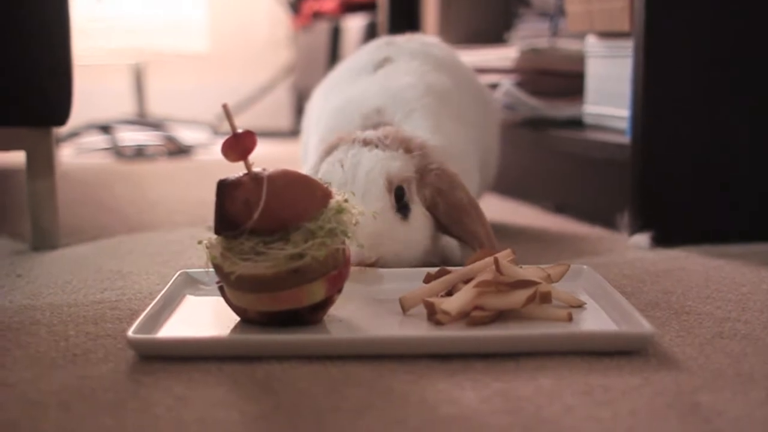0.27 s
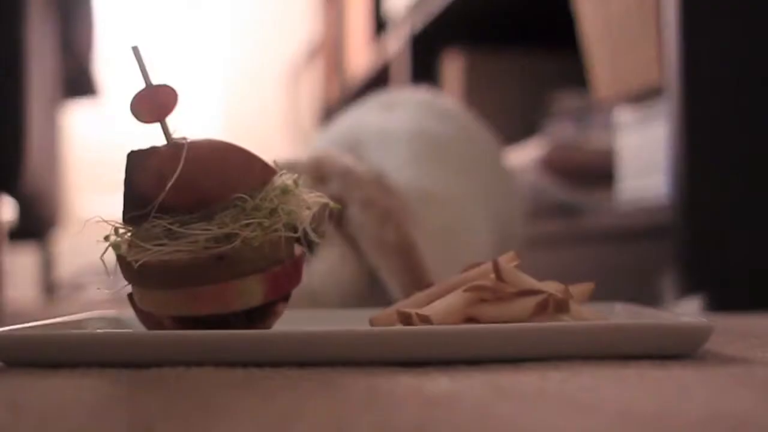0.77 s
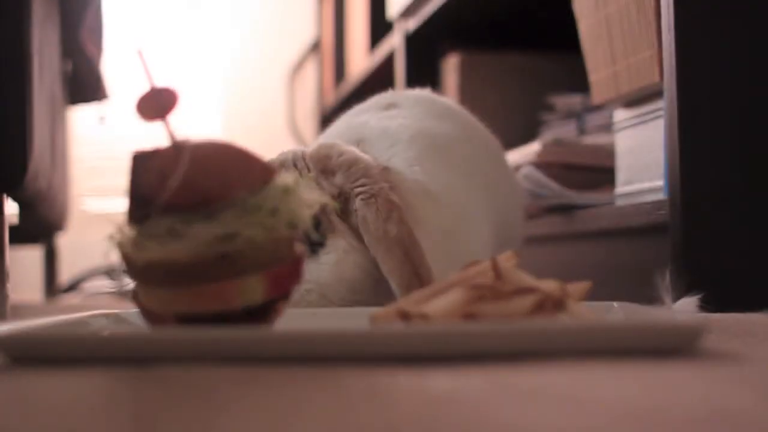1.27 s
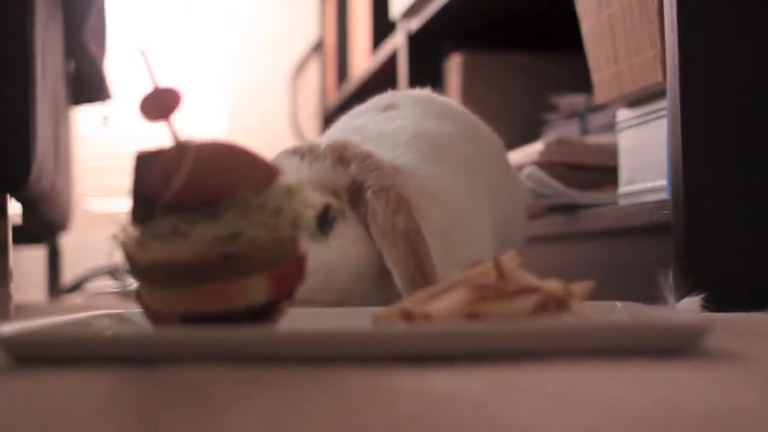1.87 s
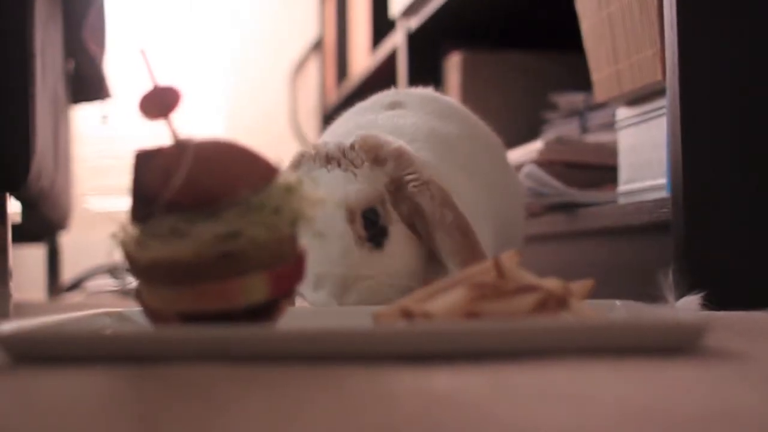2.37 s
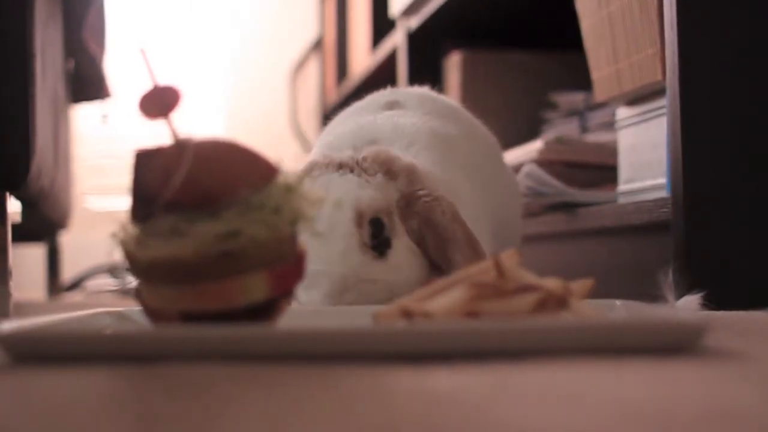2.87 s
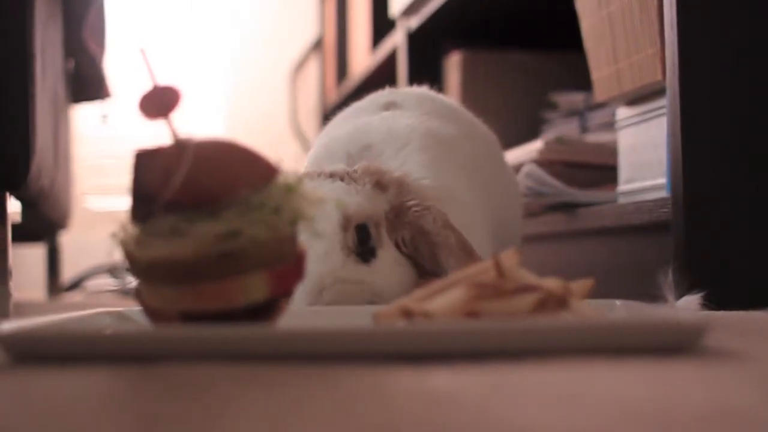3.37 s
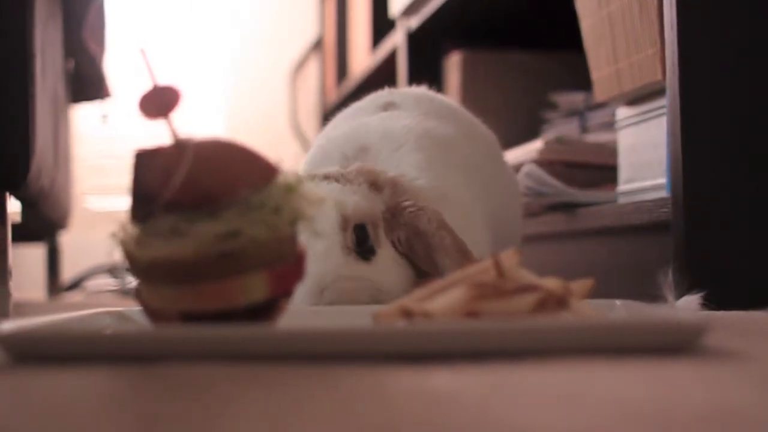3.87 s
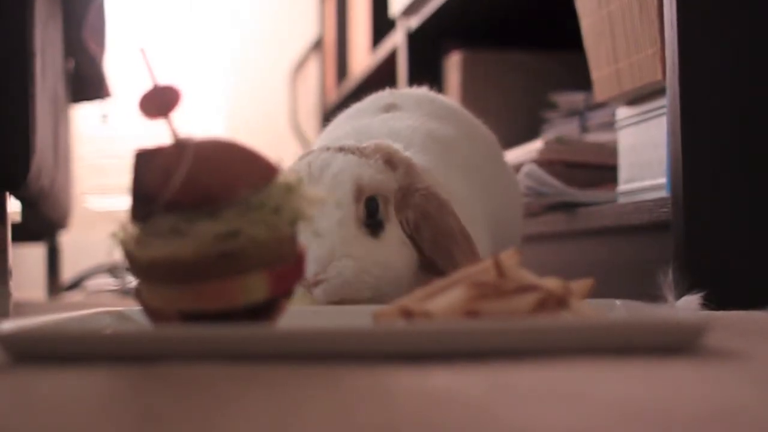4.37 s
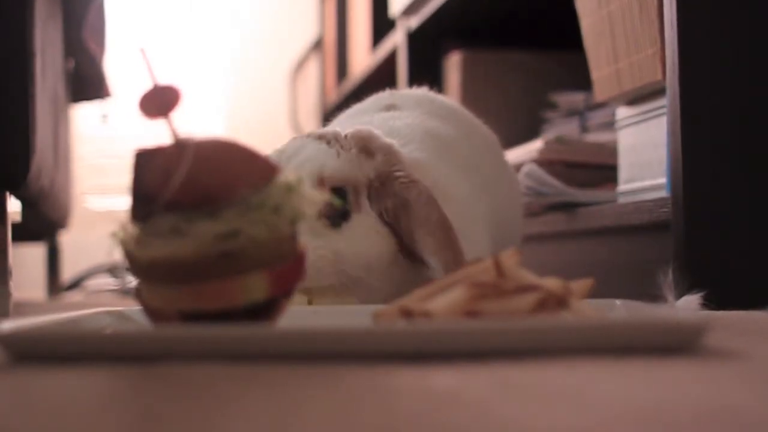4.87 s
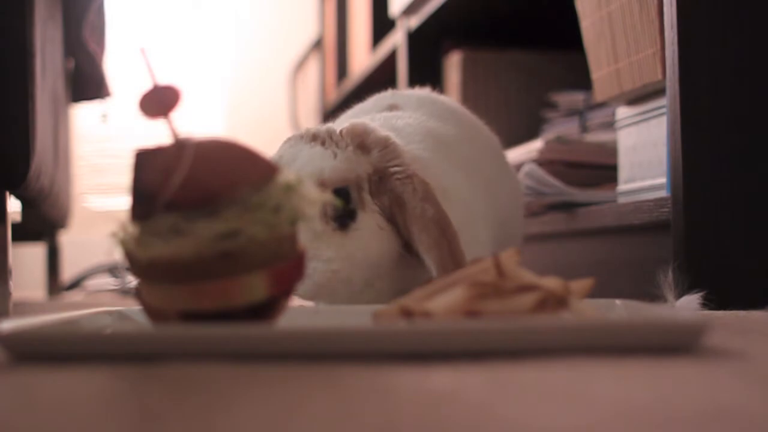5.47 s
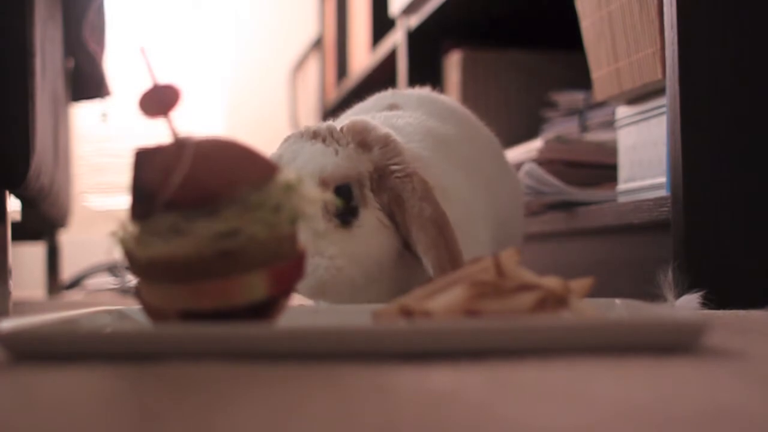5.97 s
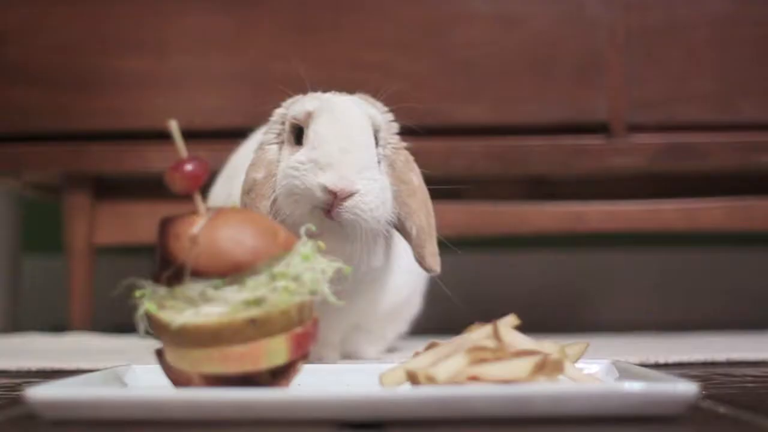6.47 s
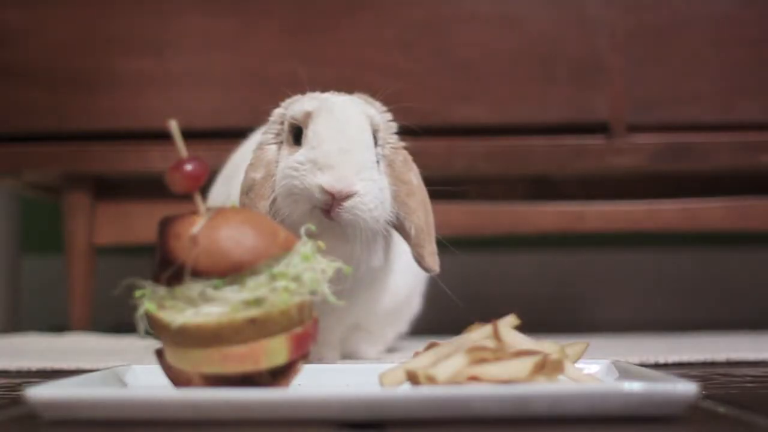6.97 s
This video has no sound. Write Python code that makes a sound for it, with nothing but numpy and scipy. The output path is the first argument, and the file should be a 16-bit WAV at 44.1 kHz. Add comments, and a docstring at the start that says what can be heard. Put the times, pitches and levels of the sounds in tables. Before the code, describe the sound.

Close rabbit eating: a bouncing tick, crisp leafy rustles with wet mouth clicks, soft grinding chews, one sharp crack, then brighter rustles and clicks.

```python
"""Rabbit eating sprouts, close up

On the carpet of a quiet room, a rabbit eats sprouts from a plate close to a small camera's microphone.
Shaped noise gives the rustle of tugged greens and the grinding of the jaw; struck resonances give
mouth clicks, a small dropped piece that bounces and a snapping stalk; short low tones give thumps.
A low hum swells and dies over rumble and hiss. Two short fades through silence part three shots."""
import sys
import numpy as np
from scipy import signal
from scipy.fft import rfft, irfft, next_fast_len
from scipy.io import wavfile
from scipy.ndimage import uniform_filter1d, map_coordinates

SR = 44100
rng = np.random.default_rng(int(sys.argv[2]) if len(sys.argv) > 2 else 0)


def gain_from_db(level_db):
    """Turn a decibel level (scalar or array-like) into a linear amplitude factor."""
    decades = np.asarray(level_db, float) / 20
    return 10 ** decades


def inscribe(sig):
    """Save sig as 16-bit PCM at rate SR to the path in sys.argv[1].

    A 1-D sig is mono; a 2-D sig holds one channel per row.
    Samples are clipped to [-1, 1] before scaling.
    """
    pcm = np.round(np.clip(np.atleast_2d(sig).T, -1, 1) * 32767)
    wavfile.write(sys.argv[1], SR, pcm.astype(np.int16))


N = 317916  # samples, about 7.2 s

# In stroke tables rise_s and fall_s are the times from the peak to 20 dB below it, before and after.
# In spectra only the shape counts: the noise is brought to rms 1 afterwards.

# background of each shot: start_s, rumble_at_start_db, rumble_at_end_db, hiss_db
AIR = [(0, -63, -57, -60.5), (.82, -63.5, -63.5, -59.5), (6.566, -69.5, -63, -57.5)]
# shapes of the building rumble and the microphone hiss: frequency_hz, density_db
RUMBLE_SPECTRUM = [(20, -11), (45, -10), (70, -2.5), (115, -2), (170, -5.5), (300, -20), (450, -48)]
HISS_SPECTRUM = [(150, -30), (250, 4.5), (414, 0), (710, -2.5), (1350, -4), (4000, -7), (9830, -11),
                 (13700, -12), (16000, -17.5)]

# mouth and teeth clicks, and at 0.868 s the sharp attack of the thump that follows: start_s, peak_db,
# brightest_hz, treble_db (over the click, before 5 dB more)
CLICKS = [(0.114, -48, 1780, -20), (0.137, -40, 1520, -23), (0.264, -52.5, 2520, 8),
          (0.308, -62.5, 740, 18.5), (0.868, -40, 770, -25), (1.268, -49, 1220, -10),
          (1.371, -49, 820, -40.5), (1.435, -43, 1910, -21), (1.606, -48.5, 1400, -25),
          (1.712, -39, 1580, -21), (1.718, -26, 2510, -18), (1.733, -30, 1450, 1), (1.805, -36, 2620, -24),
          (1.825, -29, 1450, -22), (2.698, -46, 3230, -22), (2.739, -42, 2430, -20),
          (2.783, -42.5, 2340, -15), (2.811, -36, 2420, -8), (2.822, -39, 2470, -25),
          (2.839, -39, 2370, -7), (3.057, -45.5, 1500, -18.5), (3.065, -48, 1440, -20),
          (3.448, -43.5, 1580, -16), (3.675, -47.5, 1370, -18), (3.771, -45, 1210, -24),
          (3.995, -46.5, 870, -7), (4.194, -51, 1300, -20), (4.288, -46.5, 1170, -10),
          (4.323, -36.5, 2250, -13), (4.505, -53.5, 1340, -5.5), (4.543, -48, 891, -11),
          (4.574, -52, 2000, -12), (4.721, -48, 2400, -2), (5.114, -53, 1320, -18), (5.451, -49, 1360, -13),
          (5.461, -53, 1420, -9), (5.533, -50, 1310, -21), (5.582, -35, 1580, -30),
          (5.611, -33.5, 2650, -29), (5.63, -35.5, 2120, -23.5), (5.749, -41, 1080, -24),
          (5.749, -47.5, 2600, -24), (6.058, -49, 2140, -20), (6.441, -47, 1310, -7),
          (6.517, -18.5, 3900, -19), (6.636, -37.5, 1210, -13), (6.757, -24, 3850, -21),
          (6.949, -39, 2540, -9), (7.058, -33, 1670, -14), (7.157, -41, 2420, -12)]
# resonances of the mouth: frequency_hz, width_hz (at least 300 is used), relative_level_db
MOUTH = [(600, 1300, -38), (1690, 260, -3.5), (2370, 520, 3), (2750, 490, -4), (3900, 960, 2)]
# decay of the room: frequency_hz, t60_s
ROOM = [(200, 0.69), (2000, 0.24), (12000, 0.032)]

# bounces of the dropped piece: start_s, peak_db, hardness_hz
BOUNCES = [(0.5529, -15.5, 6000), (0.5885, -21.5, 2920), (0.605, -27, 1800), (0.6338, -35, 1200)]
# what the piece rings with: frequency_hz, relative_level_db, t60_s
PIECE = [(163, -9, 0.032), (314, -16, 0.076), (580, 16.5, 0.0041), (1007, 6, 0.0091), (1400, -31, 0.0062),
         (2060, 1, 0.0078), (3770, -8, 0.0056)]

# one long drag of the heap: time_s, rustle_db
DRAG = [(.84, -64), (.894, -57.5), (1.14, -62), (1.26, -67.5), (1.33, -83)]
# in the drag, over its rustle [dB]: plate weight, broad leaves, fibres, fur
DRAG_MIX_DB = [-3, 4.5, -3.5, -5]
# the greens are tugged: strongest_s, rise_s, fall_s, rustle_db, crispness_db (over the rustle)
TUGS = [(1.268, 0.0091, 0.012, -61, 4), (1.716, 0.029, 0.049, -51, -2), (1.75, 0.056, 0.022, -44, 4.5),
        (1.8, 0.059, 0.095, -50.5, 5), (1.89, 0.055, .1, -39, -1), (1.959, 0.13, .14, -34.5, 3),
        (2.165, .05, 0.13, -48.5, 1), (2.25, 0.047, 0.15, -57.5, 2), (2.34, 0.1, 0.068, -56, 3),
        (2.4, 0.065, 0.043, -44, -4), (2.476, 0.085, 0.11, -52.5, -2), (2.644, 0.068, 0.098, -54, -9),
        (2.78, .04, 0.062, -64.5, -3), (2.85, 0.049, 0.023, -56, 2), (2.912, .07, 0.041, -52.5, -15),
        (6.6, 0.028, .05, -53.5, 2.5), (6.646, 0.046, .05, -46, 3.5), (6.69, 0.056, 0.18, -50, 2.5),
        (6.757, 0.011, 0.091, -41, 7), (6.801, 0.084, 0.11, -42, 8.5), (6.952, 0.01, .03, -45, -2),
        (6.976, 0.025, 0.038, -42.5, -2), (7.03, 0.024, 0.016, -44, -3), (7.064, 0.021, 0.034, -52.5, 7.5),
        (7.12, .04, .07, -59.5, -3), (7.205, .07, .05, -58.5, 1)]
# broad leaves bend and fold: strongest_s, rise_s, fall_s, level_db
FOLDS = [(1.74, 0.044, 0.082, -48.5), (1.828, 0.037, 0.016, -51), (1.88, 0.031, 0.18, -43.5),
         (1.96, 0.15, 0.44, -54), (2.178, 0.045, 0.067, -51), (2.27, .06, 0.12, -55.5),
         (2.4, 0.079, 0.056, -48.5), (2.48, 0.087, 0.12, -52.5), (2.65, .06, 0.078, -55.5),
         (2.85, 0.032, .02, -56), (2.91, .07, 0.057, -58.5), (6.646, 0.048, 0.072, -47),
         (6.765, 0.019, .05, -40), (6.82, 0.098, 0.073, -45.5), (6.975, 0.029, 0.036, -51),
         (7.035, 0.024, 0.025, -52), (7.066, 0.02, 0.1, -50.5), (7.2, .06, .04, -55.5)]
# fur brushes along the heap: strongest_s, rise_s, fall_s, level_db
BRUSHES = [(1.75, 0.041, 0.063, -51), (1.82, .05, .06, -59), (1.89, 0.055, 0.077, -45),
           (1.955, 0.09, 0.11, -38.5), (2.06, .05, 0.035, -52), (2.165, 0.032, 0.092, -60),
           (2.39, .06, .04, -68), (6.62, 0.071, 0.088, -57), (6.69, 0.093, .08, -49.5),
           (6.75, .04, 0.06, -49.5), (6.805, 0.07, 0.11, -45), (6.97, 0.031, 0.059, -51),
           (7.02, 0.034, 0.043, -52), (7.064, .03, 0.044, -54)]
# the muzzle leans on the plate: strongest_s, rise_s, fall_s, level_db
LEANS = [(1.72, 0.0072, 0.094, -45), (1.83, 0.053, 0.073, -48.5), (2.45, 0.21, 0.16, -53),
         (2.655, 0.044, 0.043, -57), (6.8, .05, 0.065, -49), (6.976, 0.028, .03, -52.5),
         (7.035, 0.023, 0.072, -56)]
# shapes of the five sounds of the heap: frequency_hz, density_db
RUSTLE_SPECTRUM = [(1300, -15.5), (2000, -1.5), (2700, 4), (3400, 3), (4200, 3.5), (5000, -1), (5600, -10),
                   (7000, -23)]
LEAVES_SPECTRUM = [(500, -30.5), (900, 0), (1400, 4), (1900, -3.5), (2600, -28)]
WEIGHT_SPECTRUM = [(80, -32), (150, -2.5), (300, 1.5), (500, -0.5), (750, -2), (1100, -29)]
FIBRES_SPECTRUM = [(3500, -30), (5500, -2.5), (7000, -4), (8500, -7), (10500, -16)]
FUR_SPECTRUM = [(7000, -30), (9500, -5.5), (11000, 0), (13000, 2.5), (16000, -4.5)]

# low thumps, some under the tugs and the snap: start_s, peak_db, pitch_hz
THUMPS = [(0.869, -41.5, 365), (1.717, -37, 255), (1.734, -37, 148), (1.759, -42, 62.7),
          (3.203, -51.5, 250), (4.417, -52, 400), (5.342, -48.5, 247), (5.348, -51, 180), (5.929, -47, 260)]
# the plate scrapes on the carpet: strongest_s, rise_s, fall_s, level_db
SCRAPES = [(1.745, 0.016, 0.036, -41), (1.83, 0.06, 0.076, -50.5), (6.965, 0.027, 0.13, -51.5),
           (7.06, .08, 0.11, -53), (7.198, .06, .02, -53)]
# shape of the scrape: frequency_hz, density_db
PLATE_SPECTRUM = [(2000, -23), (2450, -1), (2700, -4), (2950, -21), (3500, -43)]

# grinding strokes of the jaw: strongest_s, rise_s, fall_s, grinding_db, squelch_db (over the grinding)
CHEWS = [(3.44, 0.027, 0.1, -64, 0.5), (3.894, 0.015, 0.18, -61, -1.5), (4.006, 0.071, 0.03, -56.5, -9),
         (4.298, 0.018, .04, -60, 3.5), (4.336, 0.035, 0.03, -51.5, -6.5), (4.366, .008, .012, -58, -8),
         (4.389, .006, .012, -61, -8), (4.51, 0.0092, 0.11, -53.5, -2.5), (4.72, 0.0055, 0.033, -52.5, -6),
         (4.742, 0.023, 0.043, -46, -8), (4.786, .02, .03, -54, -8), (4.975, 0.021, .05, -59, -12),
         (5.022, 0.062, 0.041, -55.5, -15), (5.21, 0.018, 0.064, -57, -14), (5.25, 0.043, .03, -59, -16),
         (5.432, 0.036, 0.065, -51.5, -11), (6.15, .01, 0.096, -64.5, -2)]
# shapes of the grinding and the wet squelch: frequency_hz, density_db
GRIND_SPECTRUM = [(5000, -22), (8000, -8.5), (10500, 0), (12000, 3.5), (14000, 1), (16000, 1)]
SQUELCH_SPECTRUM = [(400, -4), (800, -6), (1400, 0), (2300, -10.5), (4000, -5), (7000, -11), (9000, -21)]

# the stalk gives a first tick, then cracks through: strongest_s, rise_s, fall_s, force_db
SNAP = [(5.9257, 0.00066, .003, -38), (5.9292, 0.0019, 0.011, -23.5)]
# what stalk and plate ring with: frequency_hz, relative_level_db, longest_t60_s
STALK = [(600, -22, 0.0055), (1210, -31, 0.013), (1880, -3, .02), (2850, -20, 0.013), (3250, -29, .005),
         (3900, 8, 0.0095), (4560, 8, 0.0058), (6000, 7, 0.0072), (8950, 6, 0.0043), (12000, 16.5, 0.0017)]

# band that is kept: lowest_hz (the microphone's low roll-off, 3 dB down), highest_hz (upper cutoff)
BAND_HZ = (35, 15850)
# silences between shots: silent_from_s, silent_until_s, fade_s
CUTS = [(.817, .822, .042), (6.564, 6.568, .042)]


def unit(x):
    """Scaled to rms 1."""
    return x / np.sqrt(np.mean(x ** 2) + 1e-20)


def along(points, hz):
    """Reads (Hz, value) points on a log frequency axis."""
    f, v = np.transpose(points)
    return np.interp(np.log(hz + 1), np.log(f + 1), v)


def strokes(rows, release=1.35):
    """Gains of strokes summed in power, one per level column; release 1 dies evenly in dB, 2 is a bell."""
    power = np.zeros((len(rows[0]) - 3, N))
    for s, rise, fall, db, *relative_db in rows:
        near = slice(max(round((s - 2 * rise) * SR), 0), round((s + 4 * fall) * SR))
        t = np.arange(N)[near] / SR
        off = np.where(t < s, ((s - t) / rise) ** 2, (abs(t - s) / fall) ** release)
        column_gain = gain_from_db(np.array([[0, *relative_db]]).T)
        power[:, near] += gain_from_db(db - 20 * off) ** 2 * column_gain ** 2
    return np.sqrt(power)


def wobble(rate):
    """A smooth random curve, rate knots a second."""
    knots = rng.standard_normal(int(N * rate / SR) + 4)
    return map_coordinates(knots, [np.arange(N) * rate / SR])


def coloured(x, spectrum):
    """x through a (Hz, dB) spectrum closed an octave beyond both ends, rms 1."""
    m = next_fast_len(N + 8192)
    hz = np.fft.rfftfreq(m, 1 / SR)
    closed = [(spectrum[0][0] / 2, -100), *spectrum, (spectrum[-1][0] * 2, -100)]
    return unit(irfft(rfft(x, m) * gain_from_db(along(closed, hz)), m)[:N])


def crackle(spread_db, clump_db, clump_rate):
    """Dense tiny breaks, some larger than the rest but none huge, arriving in clumps."""
    rank = np.minimum(rng.exponential(size=N), 5)
    size_db = spread_db * rank + clump_db * wobble(clump_rate)
    return gain_from_db(size_db) * rng.standard_normal(N)


def patchy(x, depth_db):
    """Patches of pitch and time stand out, as different fibres give way."""
    z = signal.stft(x, nperseg=256)[2]
    field = uniform_filter1d(rng.standard_normal(z.shape), size=7, axis=0)
    field = uniform_filter1d(field, size=6, axis=1)
    return signal.istft(z * gain_from_db(depth_db * unit(field)), nperseg=256)[1][:N]


def ringing(modes, t):
    """The (Hz, dB, t60 s) modes struck once, each a decaying sine."""
    return sum(gain_from_db(db - 60 * t / t60) * np.sin(2 * np.pi * hz * t) for hz, db, t60 in modes)


def above(x, hz):
    """High-pass: small things radiate little below their size."""
    return signal.lfilter(*signal.butter(2, hz, "high", fs=SR), x)


def add(track, s, sound, db):
    """Lays a sound on the track at its time and peak level."""
    track[round(s * SR):][:len(sound)] += gain_from_db(db) * sound / np.abs(sound).max()


def background():
    """Unsteady building rumble, drifting in level through each shot, and the even hiss of the microphone."""
    s, first_db, last_db, hiss_db = np.transpose(AIR)
    t = np.arange(N) / SR
    shot = np.interp(t, [*s, N / SR], np.arange(len(s) + 1))
    k = shot.astype(int)
    rumble_db = first_db[k] + (last_db - first_db)[k] * (shot - k)
    rumble_gain = gain_from_db(rumble_db + 1.6 * wobble(4.03))
    rumble = rumble_gain * coloured(rng.standard_normal(N), RUMBLE_SPECTRUM)
    hiss = gain_from_db(hiss_db[k]) * coloured(rng.standard_normal(N), HISS_SPECTRUM)
    return rumble + hiss


def clicks():
    """A wet contact parts in random jerks; the mouth rings, strongest near the click's pitch, until it shuts."""
    track, t = np.zeros(N + SR), np.arange(700) / SR
    # each click begins 1 ms after its listed time
    onset_delay_s, parting_s = .001, .003
    chances = rng.standard_normal((len(CLICKS), 2, len(t)))
    for (s, db, hz, treble_db), chance in zip(CLICKS, chances):
        # dB lost per octave from the pitch: hard clicks wake every resonance
        narrow_db = np.clip(-.7 * (db + 19), 0, 14)
        modes = [(f, g - 3 - narrow_db * abs(np.log2(f / hz)), 2.8 / max(w, 300)) for f, w, g in MOUTH]
        modes.append((hz, narrow_db - 8.5, .011))
        jerks = chance[0] * abs(chance[0]) * (t < parting_s)
        jerks[0] = 5
        shut = gain_from_db(-np.maximum(t - parting_s - .0012, 0) * 5000)
        mouth = np.convolve(jerks, ringing(modes, t))[:len(t)] * shut
        treble = np.diff(chance[1], 2) * gain_from_db(-60 * t[2:] / .012)
        add(track, s + onset_delay_s, mouth, db)
        add(track, s + onset_delay_s, treble, db + treble_db + 5)
    return above(track[:N], hz=442)


def room(x):
    """The room's answer, 150 samples late: noise in which each frequency dies at its own speed."""
    hz, t, z = signal.stft(rng.standard_normal(SR // 3), SR, nperseg=256)
    decay = gain_from_db(-60 * t / along(ROOM, hz)[:, None])
    tail = signal.istft(z * decay, SR, nperseg=256)[1]
    return signal.fftconvolve(np.pad(x, (150, 0)), tail / np.linalg.norm(tail))[:N]


def knock(hard_hz, t):
    """The piece struck once: a soft contact builds up slowly and leaves the modes above hard_hz asleep."""
    modes = [(hz, db - 12 * (hz / hard_hz) ** 2, t60) for hz, db, t60 in PIECE]
    return ringing(modes, t) * (1 - np.exp(-t / .0012))


def drop():
    """The piece bounces, softer each time; a duller, inverted echo follows each bounce 7 ms later."""
    track, t = np.zeros(N + SR), np.arange(3000) / SR
    for s, db, hard_hz in BOUNCES:
        add(track, s, knock(hard_hz, t), db)
        add(track, s + .0068, -knock(700, t), db - 12)
    return above(track[:N], hz=130)


def greens():
    """Tugging rustles the sprouts, presses on the plate and tears fibres; leaves fold and fur brushes past."""
    t, (pull, crisp) = np.arange(N) / SR, strokes(TUGS)
    # weight on the plate grows more slowly than the pull, and is fainter in the last, farther shot
    middling_db, weight_db, farther_db, growth = -55, -7.5, -3.5, .4
    pressed = gain_from_db(middling_db + weight_db + farther_db * (t > AIR[-1][0]))
    pressed = pressed * (pull / gain_from_db(middling_db)) ** growth
    drag = gain_from_db(np.interp(t, *np.transpose(DRAG), -200, -200))
    drag_weight, drag_broad, drag_fibres, drag_fur = [drag * gain_from_db(mix_db) for mix_db in DRAG_MIX_DB]
    rustle = pull + drag
    weight = np.hypot(pressed, strokes(LEANS)[0]) + drag_weight
    broad = strokes(FOLDS)[0] + drag_broad
    fibres = gain_from_db(-9.5) * crisp + drag_fibres
    fur = strokes(BRUSHES)[0] + drag_fur
    leaves = patchy(crackle(spread_db=3.5, clump_db=1.2, clump_rate=70), depth_db=1.7)
    tearing = patchy(crackle(spread_db=3, clump_db=0.6, clump_rate=100), depth_db=0.5)
    body = rustle * coloured(leaves, RUSTLE_SPECTRUM) + broad * coloured(leaves, LEAVES_SPECTRUM)
    body = body + weight * coloured(leaves, WEIGHT_SPECTRUM)
    return body + fibres * coloured(tearing, FIBRES_SPECTRUM) + fur * coloured(tearing, FUR_SPECTRUM)


def thumps():
    """Low thumps, some under the tugs and the snap: a few low cycles with a gentle start."""
    track, t = np.zeros(N + SR), np.arange(4000) / SR
    for s, db, hz in THUMPS:
        envelope = np.exp(-t * hz / 1.26) * (1 - np.exp(-t / 0.001))
        add(track, s, np.sin(2 * np.pi * hz * t) * envelope, db)
    return track[:N]


def scrape():
    """Stick and slip under the plate sound one broad mode of it."""
    slips = crackle(spread_db=2.5, clump_db=1, clump_rate=110)
    return strokes(SCRAPES)[0] * coloured(slips, PLATE_SPECTRUM)


def chewing():
    """Molars grind in short slips, heard high up, with a wetter sound below."""
    grind, squelch = strokes(CHEWS)
    slips = patchy(crackle(spread_db=3, clump_db=2, clump_rate=90), depth_db=2.5)
    return grind * coloured(slips, GRIND_SPECTRUM) + squelch * coloured(slips, SQUELCH_SPECTRUM)


def hum():
    """A slightly wavering low tone, near 63 Hz, swells and dies."""
    turns = np.cumsum(63 * (1 + .04 * wobble(7.6))) / SR
    swell = strokes([(5.48, .5, .45, -61.5)])[0]  # strongest_s, rise_s, fall_s, level_db
    return swell * np.sqrt(2) * np.sin(2 * np.pi * turns)


def snap():
    """Tearing fibres shake the modes of stalk and plate; the stronger, the brighter, up to a white crack."""
    strength = strokes(SNAP, release=0.95)[0]
    force = strength * unit(crackle(spread_db=2, clump_db=0, clump_rate=9))
    bright = strength / strength.max()
    force = bright * force + (1 - bright) * 2 * uniform_filter1d(force, size=7)
    # moist fibre damps within a few cycles
    modes = [(hz, db, min(t60, 36 / hz)) for hz, db, t60 in STALK]
    ring = ringing(modes, np.arange(1500) / SR)
    rung = signal.fftconvolve(force, ring / np.linalg.norm(ring))[:N]
    return above(1.54 * bright * force + rung, hz=690)


def scene():
    """Everything near the plate, the room's echo of blows, thumps and clicks, and the background."""
    blows, mouth = drop() + snap() + thumps(), clicks()
    echo = gain_from_db(-24) * room(blows + gain_from_db(-8) * mouth)
    return (blows + mouth + echo + greens() + scrape() + chewing() + hum() + background())[None]


def roll_off(x):
    """The treble ends steeply here."""
    return signal.sosfilt(signal.butter(12, 16480, fs=SR, output="sos"), x)


def record(dry):
    """The microphone rolls off the lows, an upper cutoff ends the band; fades part the shots."""
    size = next_fast_len(N)
    t, hz = np.arange(N) / SR, np.fft.rfftfreq(size, 1 / SR)
    lowest_hz, highest_hz = BAND_HZ
    response = (hz < highest_hz) * hz / np.hypot(hz, lowest_hz)
    heard = irfft(rfft(dry, size) * response, size)[:, :N]
    fade = 1
    for start, end, length in CUTS:
        fade = fade * np.clip(np.maximum(start - t, t - end) / length, 0, 1)
    return roll_off(heard * fade)


dry = scene()
out = record(dry)
inscribe(out)
```